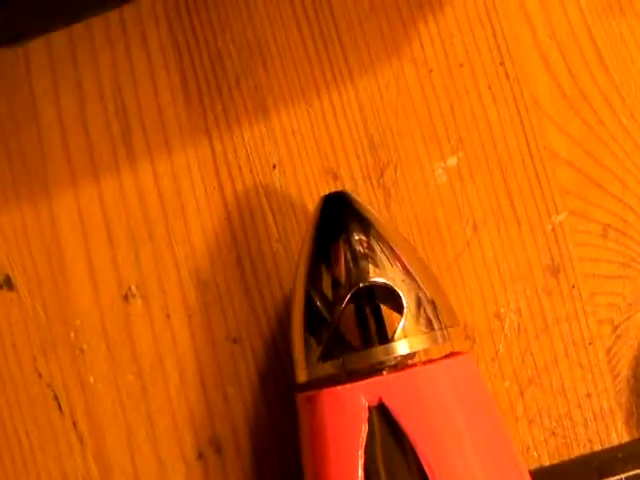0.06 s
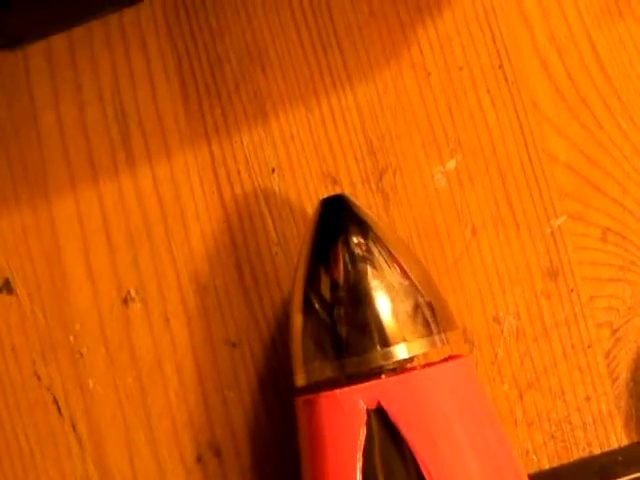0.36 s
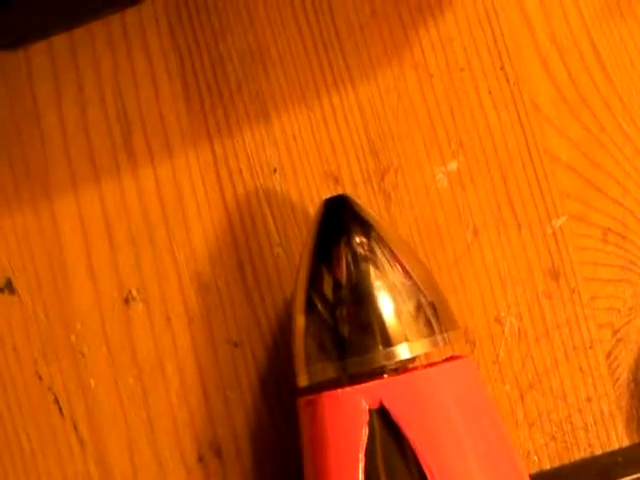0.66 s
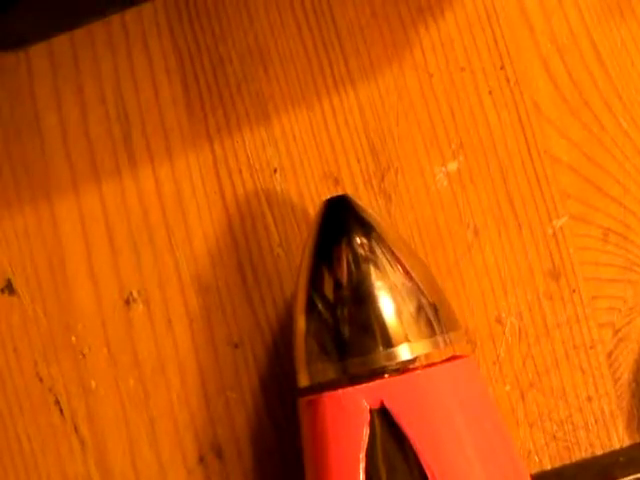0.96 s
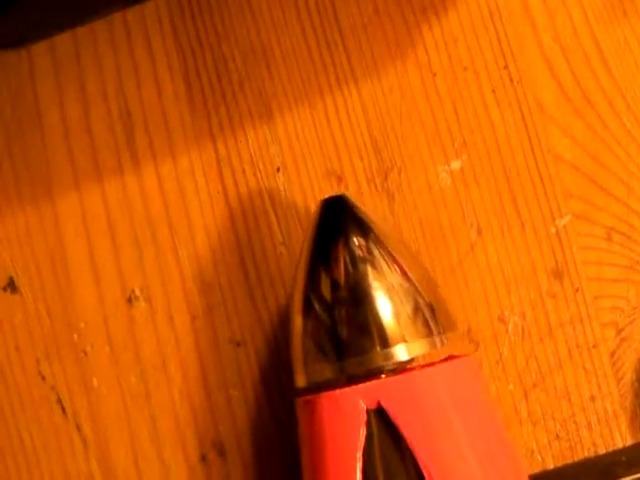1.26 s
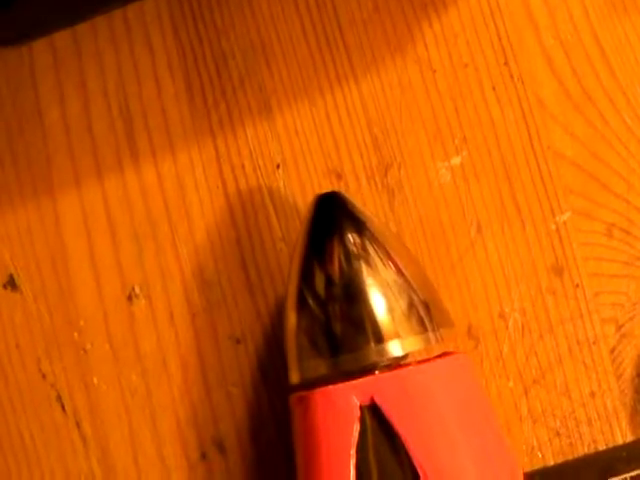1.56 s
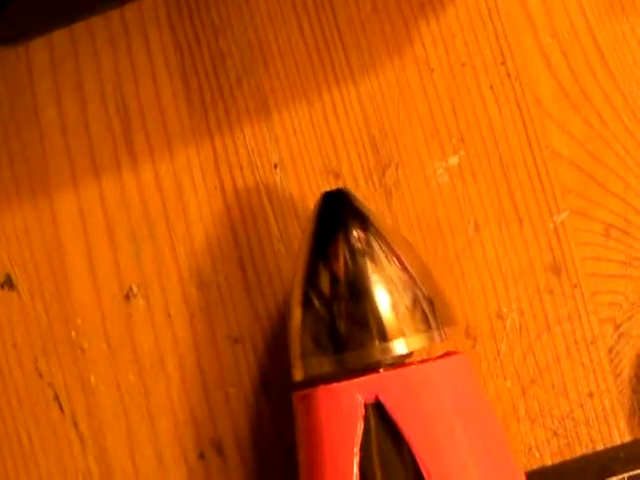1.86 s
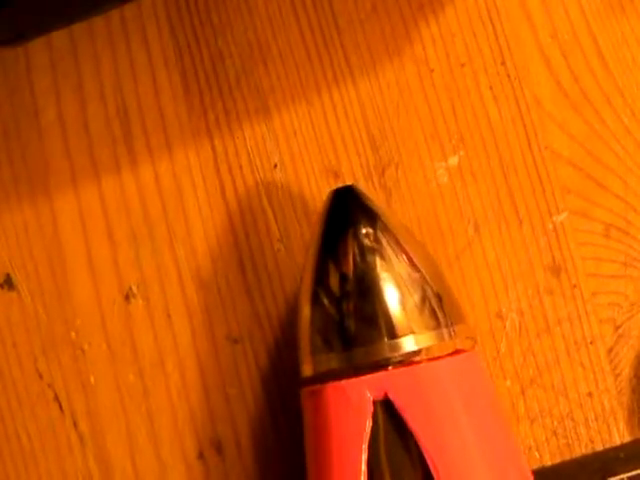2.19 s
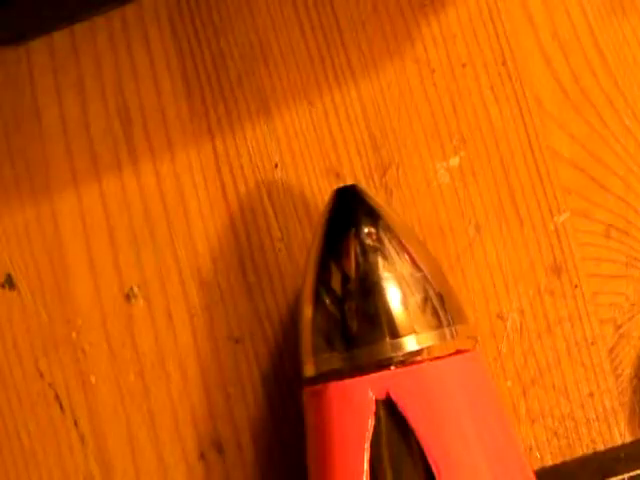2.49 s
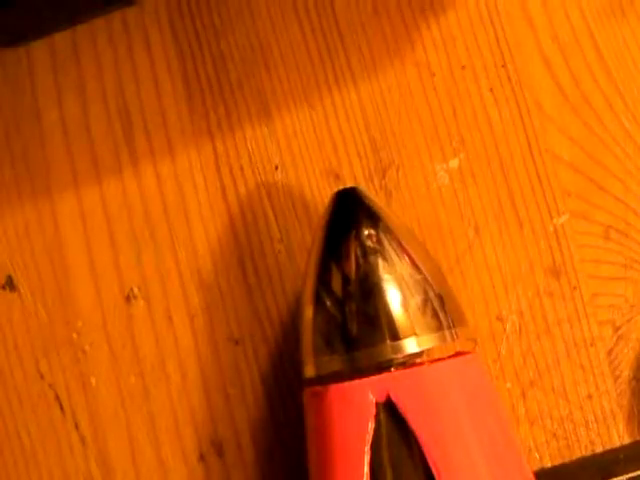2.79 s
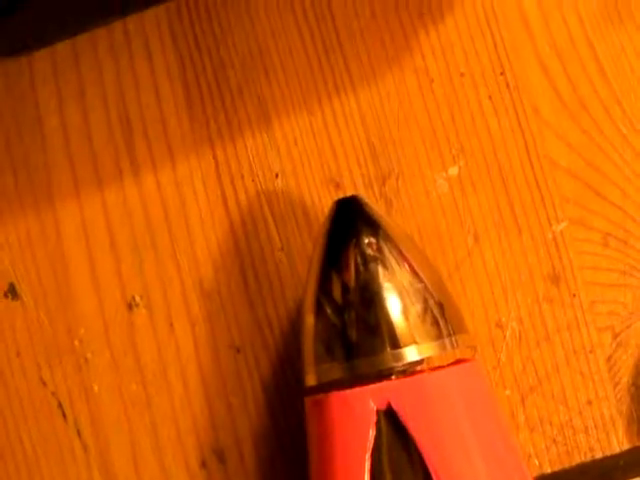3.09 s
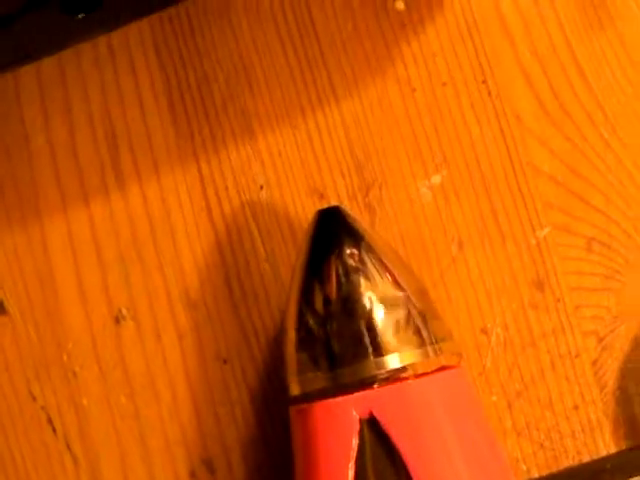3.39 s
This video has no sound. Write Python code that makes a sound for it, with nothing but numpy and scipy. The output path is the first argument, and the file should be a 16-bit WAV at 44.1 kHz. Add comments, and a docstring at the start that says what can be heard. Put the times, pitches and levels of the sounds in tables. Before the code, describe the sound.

A small electric motor spins up with a rattle, buzzes hard, then winds down.

```python
"""Two sharp ticks and a thin whistle: a small hand-held electric motor starts up close by, over a wooden
table. The whistle comes from its switching drive, and its gears whine while it is slow. As it speeds up,
loose parts chatter and the loose rotor knocks twice a turn in the growling plastic housing. At top speed
it settles into a clean, hard buzz, then rattles again as it slows and stops with a few ticks."""
import sys
import numpy as np
from scipy import signal
from scipy.fft import rfft, irfft
from scipy.io import wavfile
from scipy.ndimage import uniform_filter1d

SR = 44100
rng = np.random.default_rng(int(sys.argv[2]) if len(sys.argv) > 2 else 0)


def waveform_to_disk(signal):
    """Save audio, clipped to [-1, 1], as 16-bit WAV at the path in sys.argv[1]."""
    frames = np.transpose(np.atleast_2d(signal))
    scaled = np.clip(frames, -1, 1) * 32767
    samples = np.round(scaled).astype(np.int16)
    wavfile.write(sys.argv[1], SR, samples)


N = 160965
T = np.arange(N) / SR
FFT_SIZE = 2 ** 18
FREQS = np.arange(FFT_SIZE // 2 + 1) * SR / FFT_SIZE


def undb(db):
    """Turn decibels into a factor to multiply by."""
    return 10 ** (np.asarray(db) / 20)


def unit(x):
    """Scale to an average (rms) level of 1."""
    return x / np.sqrt(np.mean(x ** 2))


def curve(rows):
    """Join a time table's points with straight lines."""
    times, *columns = np.array(rows, float).T
    return np.squeeze([np.interp(T, times, column) for column in columns])


def response(rows, hz=FREQS):
    """Read a frequency table's gain at the given frequencies."""
    table_hz, db = np.array(rows, float).T
    return undb(np.interp(np.log(hz + 1), np.log(table_hz + 1), db))


def causal(gain):
    """Make a filter ring only after it is struck (minimum phase)."""
    cepstrum = irfft(np.log(gain + 1e-6))
    cepstrum[1:FFT_SIZE // 2] *= 2
    cepstrum[FFT_SIZE // 2 + 1:] = 0
    return np.exp(rfft(cepstrum))


def filtered(x, gain):
    """Turn each frequency of a sound up or down."""
    return irfft(rfft(x, FFT_SIZE) * gain)[:N]


def tail(fade_s):
    """A filter that adds a wash of echoes, 60 dB quieter after fade_s."""
    echoes = rng.standard_normal(N) * np.exp(-np.log(1000) * T / fade_s)
    return rfft(echoes / np.linalg.norm(echoes), FFT_SIZE)


def wander(per_s):
    """A random drift of about 1 up or down."""
    return unit(np.interp(T * per_s, np.arange(N), rng.standard_normal(N)))


def clicks(times, sizes):
    """Sharp clicks, which can fall between samples."""
    out, at = np.zeros(N), np.asarray(times) * SR
    nearby = at.astype(int)[:, None] + np.arange(-7, 9)
    offset = nearby - at[:, None]
    pulses = np.asarray(sizes)[:, None] * np.sinc(offset) * np.sinc(offset / 8)
    np.add.at(out, np.clip(nearby, 0, N - 1), pulses)
    return out


# The room's background noise (frequency [Hz], relative level [dB])
ROOM_NOISE = [(25, -21), (70, -15), (125, -0.5), (220, -7.5), (340, -4), (800, -19), (15000, -31)]

def room_tone(level_db=-58.5):
    """A quiet room gives a faint, low, steady rush."""
    return undb(level_db) * unit(filtered(rng.standard_normal(N), response(ROOM_NOISE)))


# The shaft's hum (time [s], level [dB])
HUM_LEVEL = [(.3, -58), (.37, -41.5), (.5, -32.5), (.65, -40), (.85, -43.5), (1.1, -48), (1.4, -38),
             (1.9, -42.5), (2.0, -41), (3.05, -45.5), (3.13, -44.5), (3.3, -39), (3.38, -83.5)]
# Its wobble, an octave lower (time [s], level [dB])
WOBBLE_LEVEL = [(.7, -68), (1.4, -63.5), (1.93, -53.5), (1.99, -90.5)]

def shaft_hum(speed, turns):
    """The unbalanced shaft hums once a turn and wobbles at half that rate; both fade at a crawl."""
    hum = undb(curve(HUM_LEVEL) + 2 * wander(40)) * np.sin(2 * np.pi * turns)
    wobble = undb(curve(WOBBLE_LEVEL) + 3 * wander(30)) * np.sin(np.pi * turns + wander(30))
    return np.sqrt(2) * (hum + wobble) * np.minimum(speed / 70, 1) ** 2


# The drive's whistle (time [s], level [dB])
WHISTLE_LEVEL = [(.183, -120), (.191, -32), (.26, -29.5), (.4, -38), (.6, -39), (1.0, -46), (3.14, -50),
                 (3.17, -40.5), (3.3, -34), (3.42, -40), (3.65, -62.5)]

def drive_whistle(turns, switch_hz=7995):
    """The coils sing at the rate their power is switched, rippling twice a turn."""
    level = undb(curve(WHISTLE_LEVEL) + .5 * wander(60))
    ripple = 1 + .2 * np.cos(4 * np.pi * turns)
    return np.sqrt(2) * level * ripple * np.sin(2 * np.pi * switch_hz * T)


# How the cap on the motor's nose rings (frequency [Hz], relative level [dB])
CAP_RING = [(100, -23), (300, -23.5), (440, -2.5), (590, -10.5), (720, -1), (870, -7.5), (1100, -4),
            (1330, -11.5), (1620, 1), (1800, 5), (2100, -4.5), (2580, 2), (3100, -6), (3800, 0),
            (4300, -7.5), (6000, -10.5), (7900, -11), (8300, -5), (8800, -12.5), (10800, -19.5),
            (12000, -29.5), (15500, -32.5)]

def cap_gain(hz=FREQS):
    """The nose cap favours the pitches it rings at."""
    return response(CAP_RING, hz)


# The whine before the cap shapes it (time [s], main tone [dB], octave above [dB])
WHINE_LEVELS = [(.2, -58, -32), (.25, -25, -29.5), (.3, -28.5, -28.5), (.4, -25.5, -32), (.55, -21.5, -24),
                (.72, -33, -24.5), (.9, -56, -47), (1.0, -100, -100), (3.12, -100, -100),
                (3.18, -25, -29.5), (3.27, -27, -33), (3.35, -26.5, -27), (3.44, -37, -29),
                (3.51, -65, -47)]

def gear_whine(speed, turns, teeth=18):
    """Meeting teeth make a sputtering tone that swells at the pitches where the cap rings."""
    phase = 2 * np.pi * teeth * turns + .3 * wander(300)
    throb_db = 2 * np.cos(2 * np.pi * turns)
    out = 0
    for k, db in enumerate(curve(WHINE_LEVELS), 1):
        sputter_db = 5 * np.tanh(wander(250))
        out += undb(db + sputter_db + throb_db) * cap_gain(k * teeth * speed) * np.sin(k * phase)
    return out


# Single blows of the gears (time [s], strength [dB], dulled above [Hz])
GEAR_BLOWS = [(.191, -6.5, 7000), (.206, -3.5, 7000), (3.435, -15, 4000), (3.486, -10, 3300),
              (3.529, -15, 2900), (3.552, -17.5, 2900)]

def gear_ticks():
    """The gears strike the cap: hard as they catch, softly as they come to rest."""
    blows = sum(filtered(clicks([at], [undb(db)]), 1 / (1 + (FREQS / top_hz) ** 4))
                for at, db, top_hz in GEAR_BLOWS)
    return filtered(blows, causal(unit(cap_gain())) * tail(.067))


# Narrow bands where the housing rings (pitch [Hz], half-width [Hz], level [dB])
HOUSING_PEAKS = [(416, 42, -32), (724, 68, -27), (1133, 225, -41), (2523, 66, -29.5), (2805, 120, -25),
                 (3205, 41, -28.5), (3784, 90, -28.5), (4570, 180, -35.5)]
# The growl while speeding up (time [s], low overtones' gain [dB], high overtones' gain [dB])
GROWL_GAINS = [(.35, -40, -45), (.55, -2, -22), (.8, 1, -14), (1.12, 0, -3), (1.55, -13, -3),
               (1.92, -13, 3), (1.98, -55, -55)]

def housing_growl(speed, turns):
    """Each overtone of the shaft swells as it climbs through a pitch where the housing rings."""
    gain = sum(undb(db) / (1 + 1j * (FREQS - hz) / width) ** 2 for hz, width, db in HOUSING_PEAKS)
    angle = 2 * np.pi * turns + .0083 * wander(120)
    low, high = undb(curve(GROWL_GAINS) + .65 * wander(90))

    def overtones(multiples):
        return sum(np.real(np.interp(k * speed, FREQS, gain) * np.exp(1j * k * angle)) for k in multiples)

    # strong and weak turns alternate, which adds tones between the low overtones
    between = undb(-18) * overtones([2.5, 3.5, 4.5, 5.5])
    return np.sqrt(2) * (low * (overtones(range(2, 8)) + between) + high * overtones(range(8, 26)))


def ring_plastic(hits, gain, ring_db=-10):
    """Struck plastic rings briefly; high pitches travel through it faster, smearing each hit."""
    travel_s, at_hz = .003, 1000
    smear = np.exp(-4j * np.pi * travel_s * np.sqrt(at_hz * FREQS))
    bass_cut = FREQS ** 4 / (FREQS ** 4 + 70 ** 4)
    body = causal(unit(gain * bass_cut))
    ring = (1 + undb(ring_db) * tail(.028)) / np.hypot(1, undb(ring_db))
    return filtered(hits, body * smear * ring)


# The tone of knocks and chatter (time [s], bass gain [dB], treble gain [dB])
RATTLE_TONE = [(.2, 6, -1), (.3, -2.5, -9), (.5, -7.5, -12.5), (.63, -16.5, -14), (.92, 0, -0.5),
               (1.03, -2, -5), (1.3, 3, -2.5), (1.55, -2, 0), (1.9, -5.5, -1), (2.05, -16, -1),
               (2.9, -16.5, 0.5), (3.12, -2, -5.5), (3.35, -2, -12.5)]

def rattle_tone(x, bass_hz=1184, treble_hz=3950):
    """The rattle's bass and treble shift with the force of contact."""
    bass = filtered(x, 1 / (1 + (FREQS / bass_hz) ** 6))
    treble = filtered(x, 1 - 1 / (1 + (FREQS / treble_hz) ** 16))
    bass_gain, treble_gain = undb(curve(RATTLE_TONE))
    return x + bass * (bass_gain - 1) + treble * (treble_gain - 1)


# Taps on the cap (time [s], strength [dB])
CHATTER_LEVEL = [(.19, -31.5), (.3, -27.5), (.45, -21.5), (.69, -17.5), (.72, -15), (.93, -18), (.99, -23),
                 (1.25, -21), (1.75, -19.5), (1.95, -21), (2.1, -23), (2.55, -26.5), (3.07, -23),
                 (3.11, -18), (3.17, -17), (3.2, -25), (3.38, -31.5), (3.45, -38.5), (3.51, -68),
                 (3.57, -82)]

def loose_chatter(speed, turns, start_s=.19):
    """Loose parts tap the cap at random: more often at speed, hardest as the rotor comes round."""
    taps_per_s = 20 * (speed + 20)
    is_tap = (rng.random(N) < taps_per_s / SR) & (T > start_s)
    scatter_db = 1.5 * np.clip(rng.standard_normal(N), -2, 2)
    throb_db = 3.5 * np.cos(2 * np.pi * turns)
    taps = is_tap * undb(scatter_db + throb_db) * rng.choice([-1, 1], N)
    taps = unit(taps / np.sqrt(taps_per_s)) * undb(curve(CHATTER_LEVEL))
    return rattle_tone(ring_plastic(taps, cap_gain()))


# The rotor's knocking (time [s], strength [dB], roughness [0-1])
KNOCKING = [(.35, -46, .5), (.6, -38, .1), (.75, -22.5, .05), (.92, -18.5, .2), (.99, -16.5, 0.5),
            (1.3, -19.5, 0.6), (1.72, -19.5, 0.6), (1.9, -19, 0.4), (1.95, -24.5, 1), (2.02, -25.5, 0.77),
            (2.55, -18.5, .15), (3.03, -26, 0.54), (3.12, -15, 0.6), (3.2, -43, .7), (3.35, -64, .4)]
# The two strikes in each turn (position [share of a turn], relative strength [dB])
STRIKES = [(0, 8), (0.542, 5.5)]
# How the struck housing rings (frequency [Hz], relative level [dB])
HOUSING_RING = [(100, -32), (200, -6.5), (290, -11), (390, -6.5), (570, 3), (630, -11.5), (730, -15),
                (900, -9.5), (1100, -1), (1350, -5.5), (1750, -2), (2150, -4.5), (2850, -0.5), (3050, -1),
                (3250, 6), (3500, 2.5), (3850, 5), (4200, -5.5), (6000, -15.5), (10700, -24), (11600, -36),
                (15500, -43.5)]

def rotor_knocks(speed, turns, jitter_s=3e-5, scatter_db=3.5, limp_db=2.5):
    """The loose rotor (the spinning part) hits the housing; roughness makes the hits uneven."""
    level_db, roughness = curve(KNOCKING)
    turn = np.arange(1, int(turns[-1]) - 1)
    hits = 0
    for position, strike_db in STRIKES:
        size_luck, time_luck = rng.standard_normal((N // 100, 2))[:len(turn)].T
        at = np.interp(turn + position, turns, T)
        rough = np.interp(at, T, roughness)
        uneven_db = scatter_db * np.tanh(size_luck) + limp_db * (-1) ** turn  # strong turn, weak turn
        hits += clicks(at + rough * jitter_s * time_luck, undb(strike_db + rough * uneven_db))
    hits = unit(hits / np.sqrt(speed)) * undb(level_db)
    return rattle_tone(ring_plastic(hits, response(HOUSING_RING)))


# The whole buzz (time [s], gain [dB])
BUZZ_GAIN = [(1.93, -53), (1.96, -4), (2.0, 1), (2.9, 0.5), (3.03, 1), (3.07, -8.5), (3.13, -37.5),
             (3.15, -66)]
# Its overtones (pitch [times the shaft speed], level as it sets in [dB], level at top speed [dB])
BUZZ_OVERTONES = [(2, -33, -32.5), (3, -38, -34), (5, -40, -44), (7, -38, -34), (9, -35, -35),
                  (10, -50, -32), (11, -23, -24), (12, -33, -37), (13, -28, -26.5), (14, -32, -38),
                  (15, -26, -17.5), (16, -27, -35), (17, -19, -42), (20, -45, -44), (21, -45, -44),
                  (22, -48, -47), (29, -52, -50), (31, -53, -50)]

def top_speed_buzz(speed, turns, low_hz=229, top_hz=240):
    """At top speed every turn repeats the last, giving clean overtones whose mix follows the speed."""
    near_top = np.clip((speed - low_hz) / (top_hz - low_hz), 0, 1)
    out = 0
    for k, low_db, top_db in BUZZ_OVERTONES:
        gain = (1 - near_top) * undb(low_db) + near_top * undb(top_db)
        phase = 2 * np.pi * k * turns + rng.standard_normal()
        flutter = undb(.7 * wander(60))
        out += gain * flutter * np.cos(phase)
    return np.sqrt(2) * out * undb(curve(BUZZ_GAIN))


# How fast the shaft spins (time [s], speed [turns per s])
SHAFT_SPEED = [(.19, 1), (.225, 26), (.3, 69), (.35, 88), (.4, 103), (.46, 117.3), (.57, 136.4),
               (.7, 150.7), (.97, 170.4), (1.07, 180.6), (1.19, 188.1), (1.55, 203.1), (1.9, 217),
               (1.94, 214.8), (1.98, 223.7), (2.15, 232.8), (2.35, 238.3), (2.69, 242), (2.9, 236.7),
               (3, 228.2), (3.04, 222.8), (3.12, 194), (3.2, 136), (3.26, 102), (3.34, 61), (3.42, 30),
               (3.5, 11), (3.56, 1)]
# Left-right spread of the whole sound (frequency [Hz], relative level [dB])
STEREO_WIDTH = [(100, -12), (1000, -14.5), (2200, -14.5), (3800, -3.5), (8000, 2.5), (13000, 2.5)]
# Chatter that reaches left and right unequally (frequency [Hz], gain [dB])
CHATTER_WIDTH = [(300, -9.5), (2000, -18.5), (4000, -11.5), (8000, -9), (13000, -0.5)]

def scene():
    """The motor in a small quiet room, heard in stereo from close by."""
    speed = np.maximum(uniform_filter1d(curve(SHAFT_SPEED), SR // 60), 1)
    turns = np.cumsum(speed) / SR
    motor = rotor_knocks(speed, turns) + loose_chatter(speed, turns) + gear_ticks()
    motor += housing_growl(speed, turns) + top_speed_buzz(speed, turns)
    motor += gear_whine(speed, turns) + shaft_hum(speed, turns)
    room_echo = undb(-16) * filtered(motor, tail(.2))
    middle = motor + room_echo + room_tone() + drive_whistle(turns)
    spread = undb(-11) * tail(.45) - 1j * undb(-6)  # scattered echoes and a quarter-cycle shift
    side = filtered(middle, response(STEREO_WIDTH) * spread)
    side += filtered(loose_chatter(speed, turns), response(CHATTER_WIDTH))  # from the far side
    return np.array([middle + side, middle - side])


def record(dry, top_hz=15800):
    """Clip peaks at full scale and cut the highest treble."""
    treble_cut = signal.ellip(10, .2, 80, top_hz, fs=SR, output="sos")
    return signal.sosfilt(treble_cut, np.clip(dry, -1, 1))


dry = scene()
out = record(dry)
waveform_to_disk(out)
```